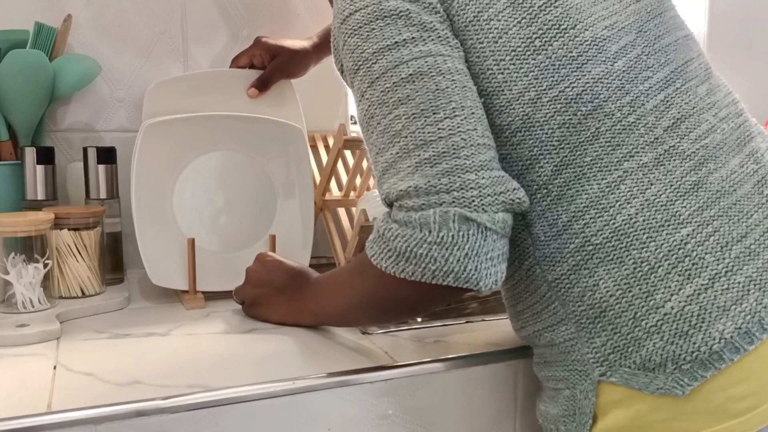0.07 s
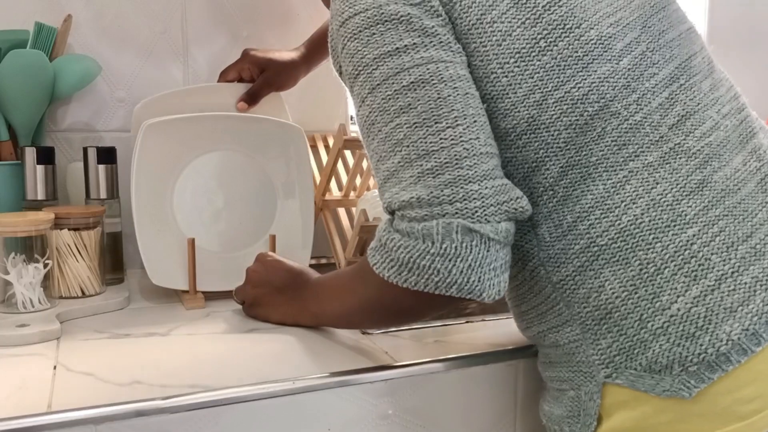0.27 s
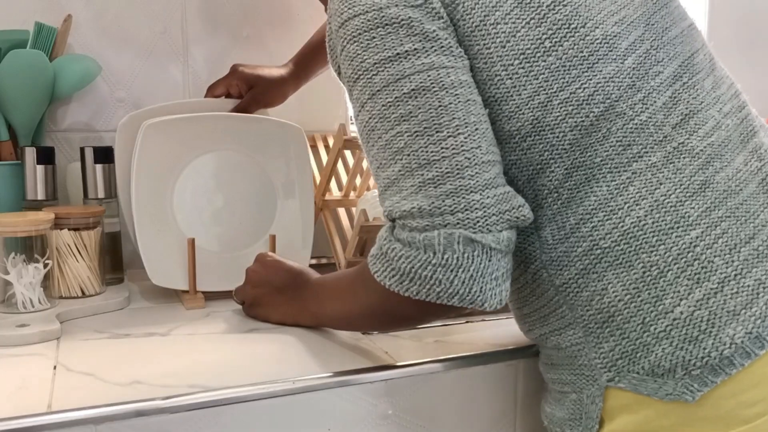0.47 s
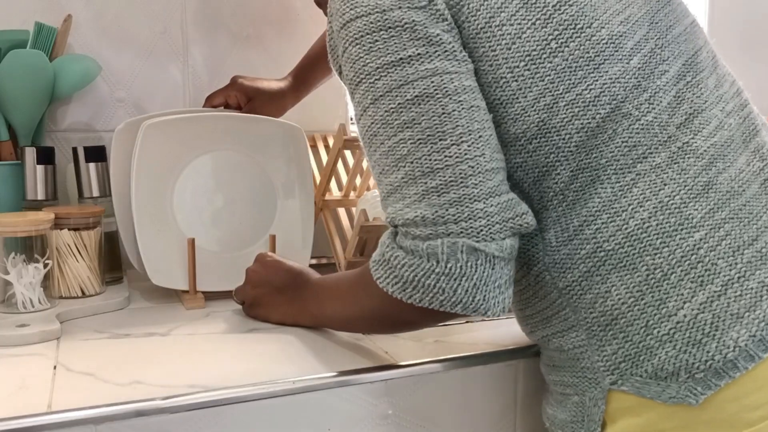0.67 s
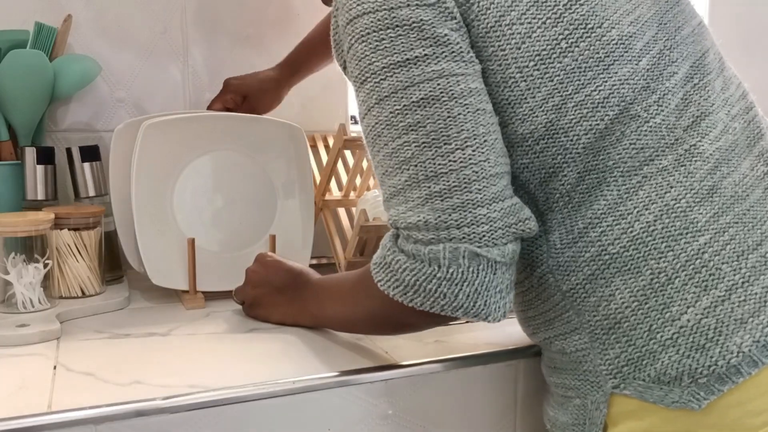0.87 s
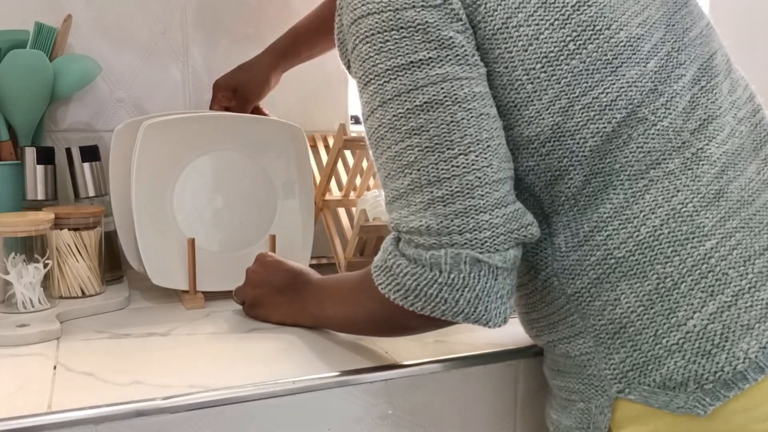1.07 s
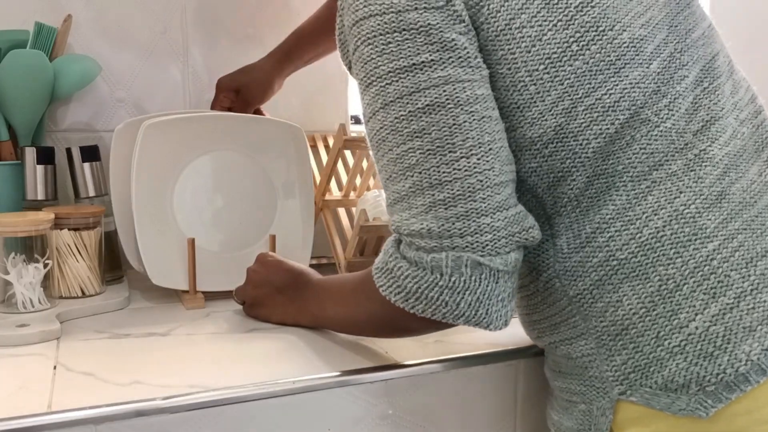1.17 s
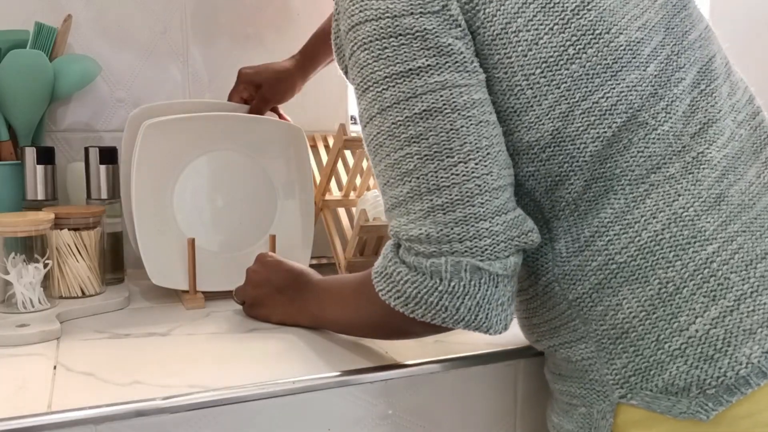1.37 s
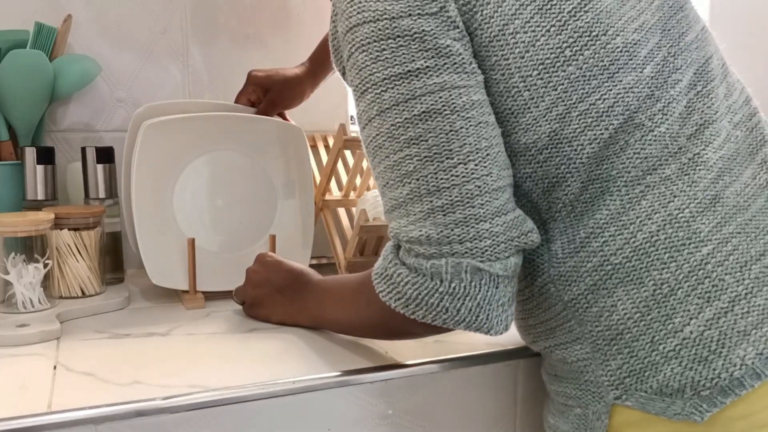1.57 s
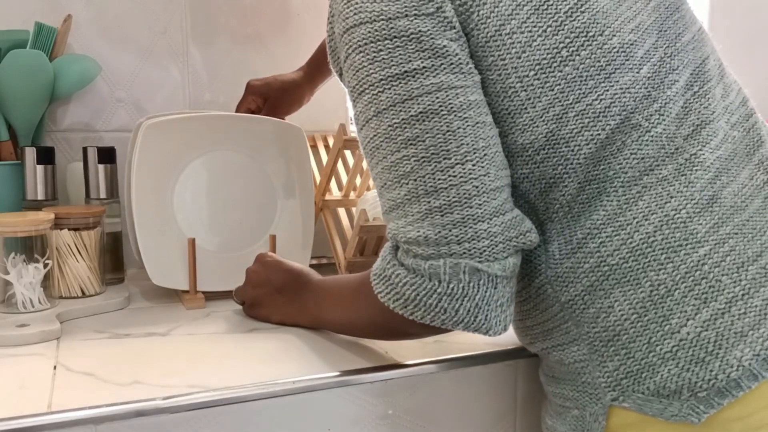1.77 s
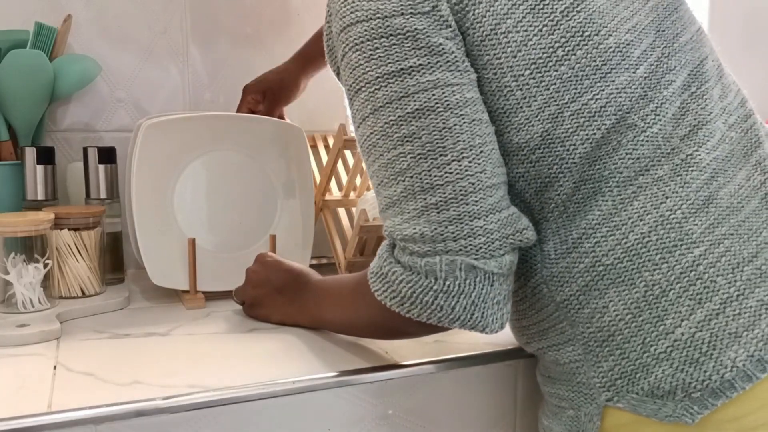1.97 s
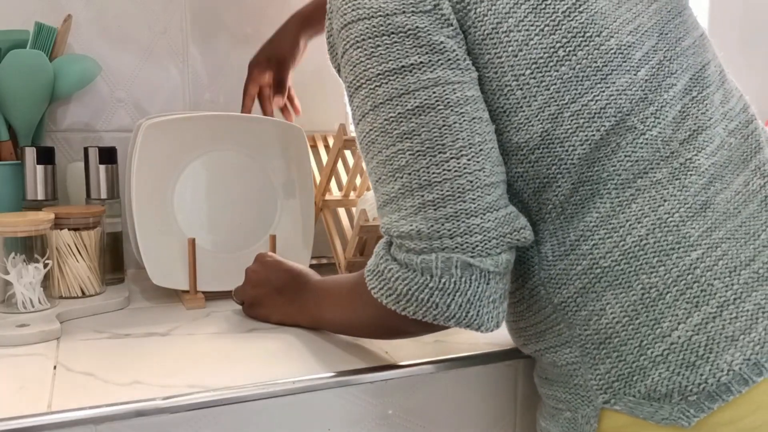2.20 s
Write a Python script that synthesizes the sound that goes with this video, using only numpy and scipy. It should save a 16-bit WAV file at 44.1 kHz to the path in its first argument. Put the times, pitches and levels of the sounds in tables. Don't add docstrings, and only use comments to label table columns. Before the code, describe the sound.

Ceramic plates clink sharply together as one is set into a wooden stand on a kitchen counter

```python
import sys
import numpy as np
from scipy import signal
from scipy.fft import rfft, irfft, next_fast_len
from scipy.io import wavfile
from scipy.ndimage import uniform_filter1d

SR = 44100
rng = np.random.default_rng(int(sys.argv[2]) if len(sys.argv) > 2 else 0)


def volts_from_decibels(level):
    exponent = np.asarray(level, float) / 20
    return 10 ** exponent


def transcribe(u):
    v = np.clip(np.atleast_2d(u).T, -1, 1)
    q = np.round(v * 32767).astype(np.int16)
    wavfile.write(sys.argv[1], SR, q)


N = 98607
T = np.arange(N) / SR
SIZE = next_fast_len(N + SR)
F = np.arange(SIZE // 2 + 1) * SR / SIZE


def curve(table, at):
    return np.interp(at, *np.array(table, float).T)


def log_curve(table, hz):
    row_hz, value = np.array(table, float).T
    return np.interp(np.log(hz), np.log(row_hz), value)


def unit(x):
    return x / np.sqrt(np.mean(x ** 2))


def convolve(x, h):
    return irfft(rfft(x, SIZE) * rfft(h, SIZE), SIZE)[..., :N]


def walk(rate_hz):
    k = int(SR / rate_hz)
    smooth = uniform_filter1d(rng.standard_normal(N), k)
    return unit(uniform_filter1d(smooth, k))


def resonate(x, bands):
    out = np.zeros(len(x))
    for hz, width_hz, db in bands:
        b, a = signal.iirpeak(hz, hz / width_hz, fs=SR)
        out += volts_from_decibels(db) * signal.lfilter(b, a, x)
    return out


def rub(levels, bands, grain_db, flicker_db):
    grit = rng.standard_normal(N) * volts_from_decibels(grain_db * rng.exponential(size=N))
    return unit(resonate(grit, bands)) * volts_from_decibels(curve(levels, T) + flicker_db * walk(23))


def stereo_noise(db):
    # (f/Hz, likeness/-1..1)
    likeness = [(150, 0.89), (300, 0.88), (600, 0.54), (1200, -0.31), (2500, 0.016), (5000, -0.057)]
    like = np.clip(log_curve(likeness, F + 1), -1, 1)
    noise = rfft(rng.standard_normal((2, SIZE))) * volts_from_decibels(db)
    mid, side = noise * np.sqrt([1 + like, 1 - like])
    return irfft(np.array([mid + side, mid - side]), SIZE)[:, :N] / 2


def room_tone():
    # (f/Hz, level/dB)
    air_colour = [(12, -44), (20, -12.5), (53, -7), (154, -7.5), (198, -4), (228, -16), (328, -8.5),
                  (949, -24.5), (16000, -39)]
    # (t/s, level/dB)
    swell = [(0, 2.5), (.5, 7.5), (1.1, 12.5), (1.7, 13.5), (2.24, 9.5)]
    air = unit(stereo_noise(log_curve(air_colour, F + 1)))
    low = signal.sosfilt(signal.butter(2, 170, fs=SR, output="sos"), air)
    rumble = low * volts_from_decibels(curve(swell, T) + 0.4 * walk(6.0))
    return volts_from_decibels(-70) * (air - low + rumble)


def slide():
    # (t/s, level/dB)
    slide_levels = [(0, -78), (.12, -101), (.18, -86), (.26, -73.5), (.36, -67.5), (.45, -76.5),
                    (.52, -59.5), (2.24, -76)]
    # (f/Hz, width/Hz, level/dB)
    slide_bands = [(450, 220, 4), (1030, 24, -1), (1290, 1350, -9.5), (1950, 180, -6.5), (3120, 1800, -31)]
    return rub(slide_levels, slide_bands, grain_db=4.7, flicker_db=0.54)


def lone_rings():
    # (t/s, f/Hz, width/Hz, level/dB)
    ring_events = [(0.5335, 2950, 64, -32), (0.861, 3400, 40, -51), (0.514, 2700, 17, -45),
                   (.603, 3032, 18, -28.5), (.615, 2503, 12, -34), (.9015, 1965, 19, -35.5),
                   (1.6985, 5400, 69, -45), (1.5415, 3050, 17, -47.5), (1.8015, 2440, 27, -29),
                   (.2215, 1016, 6.5, -64.5), (0.534, 281.5, 15, -39), (.862, 1970, 13, -47),
                   (0.99, 420, 60, -40), (.6652, 2100, 150, -43), (.68, 514, 120, -49.5),
                   (.9501, 974, 45, -44.5), (1.013, 11400, 1000, -67), (1.6, 403, 49, -55),
                   (1.1187, 11800, 2500, -60), (0.93, 4600, 1200, -55.5), (1.1614, 4700, 1400, -51.5),
                   (1.47, 270, 24, -50.5), (1.449, 474, 146, -48), (1.451, 1310, 260, -50.5),
                   (1.5232, 5260, 130, -53.5), (1.6964, 444, 15.6, -36), (1.6987, 978, 29, -34),
                   (1.6984, 880, 13, -45.5), (1.7905, 2600, 10, -36), (1.79, 2020, 53, -29.5),
                   (1.8305, 3105, 6, -30), (1.7771, 428, 94, -38), (1.811, 308, 64, -40.5),
                   (2.1, 440, 9.9, -53.5), (1.9374, 4750, 300, -41.5), (2.063, 530, 230, -60)]
    rise_s = 0.001
    out, t = np.zeros(N + SR), T[:SR // 4]
    for start_s, hz, width_hz, db in ring_events:
        i = int(start_s * SR)
        envelope = (1 - np.exp(-t / rise_s)) * np.exp(-np.pi * width_hz * t)
        out[i:i + len(t)] += volts_from_decibels(db) * width_hz * envelope * np.sin(2 * np.pi * hz * t)
    return out[:N] * 2 * np.pi / SR * volts_from_decibels(53.0)


def clinks():
    # (f/Hz, rms level/dB)
    first_clink = [(2503, -60), (2697, -47), (3031, -35), (3720, -36), (4414, -58), (4581, -57),
                   (5276, -48), (5351, -49), (6315, -60), (6939, -55), (7391, -59), (7698, -57),
                   (8183, -59), (8522, -56)]
    second_clink = [(952.8, -42.5), (1970, -50), (3499, -45), (3844, -44), (4517, -46), (5324, -61),
                    (5469, -58), (5862, -69), (6988, -57), (7445, -62)]
    third_clink = [(942.1, -54), (1986, -59), (2525, -45), (2794, -63), (3052, -59), (3973, -61),
                   (4619, -60), (4861, -59), (5324, -58), (5443, -55), (8333, -59)]
    fourth_clink = [(764.4, -58), (904.4, -54), (1927, -56), (2196, -60), (2396, -67), (2525, -50.5),
                    (3036, -48), (3090, -56), (3774, -63), (3914, -67), (4436, -53), (4829, -63),
                    (5362, -48)]
    fourth_rim = [(6401, -66), (7375, -52), (7827, -75), (8134, -76), (8425, -69), (9345, -77), (9943, -66),
                  (11235, -80), (11563, -64), (12871, -75), (13846, -80)]
    fifth_clink = [(414.5, -49), (963.6, -52), (1427, -55), (1976, -40), (2697, -45.5), (3095, -42.5),
                   (3919, -61.5), (4829, -68), (5313, -64), (6670, -67)]
    last_clink = [(1976, -53), (2046, -54), (2369, -44), (2449, -42), (2805, -56), (3112, -41), (3741, -50),
                  (4231, -53), (4834, -51), (5394, -62), (5814, -56.5), (6110, -55), (6907, -58),
                  (7364, -60)]
    # (t/s, boost level/dB, t60 at 3 kHz/s)
    clink_events = [
        (0.514, 5.5, 0.5),
        (.860, 3.5, 0.36),
        (.950, 0.5, 0.32),
        (1.319, 7, 0.58),
        (1.32, 4.5, 0.59),
        (1.698, 2.5, 0.47),
        (1.783, 4, .55),
    ]
    partials = (first_clink, second_clink, third_clink, fourth_clink, fourth_rim, fifth_clink, last_clink)
    swell_s, t60_slope = 0.004, -0.19
    beat_hz, beat_depth, spread_rad = 11, 0.53, 0.97
    out, t = np.zeros((2, N + SR)), T[:SR // 2]
    for (start_s, boost_db, t60_s), lines in zip(clink_events, partials):
        i = int(start_s * SR)
        hz, db = np.array(lines, float).T[:, :, None]
        turn, lag, beat = rng.uniform(-1.4, 1, (3, len(hz), 1))
        decay = 1000. ** (-t / (t60_s * (hz / 3000) ** t60_slope))
        beating = 1 + beat_depth * np.sin(2 * np.pi * beat_hz * (1 + beat / 2) * t + np.pi * turn)
        shape = volts_from_decibels(db + boost_db) * (1 - np.exp(-t / swell_s)) * decay * beating
        for k, side in enumerate((1, -1)):
            tones = np.sin(2 * np.pi * hz * t + side * spread_rad * lag)
            out[k, i:i + len(t)] += np.sum(shape * tones, axis=0)
    return out[:, :N]


def knocks():
    # (f/Hz, width/Hz, level/dB)
    front_plate = [(2560, 60, -17), (2695, 15, -13), (3032, 33, -9), (3087, 31, -20.5), (3728, 48, -12.5),
                   (4600, 27, -19.5), (5343, 69, -16.5), (6450, 80, -29.5), (6870, 26, -18),
                   (7370, 48, -18.5), (8090, 117, -20.5), (10040, 27, -56), (9900, 30, -42),
                   (11500, 190, -28.5)]
    back_plate = [(1797, 27, -22), (2093, 27, -13), (2093, 28, -17), (2344, 18, -8), (2460, 25, -8),
                  (2703, 77, -14.5), (3070, 76, -11.5), (3670, 270, -24), (4260, 77, -24), (5040, 39, -23),
                  (5330, 88, -38), (5990, 46, -19.5), (7410, 46, -18.5), (8700, 50, -76)]
    held_plate = [(1936, 48, -15), (2511, 21, -4), (3070, 76, -11.5), (3928, 60, -6.5), (4536, 48, -7.5),
                  (4840, 82, -12), (5380, 68, -8), (6457, 84, -12), (7400, 40, -21), (8370, 24, -13.5),
                  (9300, 20, -48), (9450, 20, -84), (11560, 54, -81), (13500, 34, -71)]
    stand = [(431, 14.7, -8.5), (594, 103, -19.5), (774, 120, -32), (960, 55, -6.5), (1230, 44, -25),
             (1455, 15, -38), (1968, 31, -12)]
    # (f/Hz, width/Hz, level/dB)
    rim_modes = [(8450, 16, -32), (9440, 17, -29), (9630, 38, -32.5), (10140, 20, -27), (11186, 44, -29),
                 (11440, 51, -34.5), (12060, 36, -31.5), (12800, 45, -35), (13260, 45, -33.5),
                 (13900, 56, -36), (14600, 65, -35)]
    # (t/s, front plate level/dB, back plate level/dB, held plate level/dB, stand level/dB)
    contacts = [(0.5147, -16.5, -77, -43, -34), (0.5334, -25, -71, -62, -38.5),
                (0.6646, -37, -36, -42.5, -36.5), (.6855, -39.5, -34, -47, -53),
                (0.7945, -55, -61, -56, -43), (0.8595, -32, -43, -36, -29), (0.9156, -41, -61, -58, -36.5),
                (0.9491, -34.5, -41, -34.5, -78), (1.016, -39, -37.5, -57, -70),
                (1.1161, -73, -79, -45, -73), (1.1614, -82, -67, -44.5, -82),
                (1.3182, -32.5, -38.5, -35, -37.5), (1.450, -72, -75, -53.5, -42),
                (1.474, -79, -74, -77, -57), (1.5217, -71, -50.5, -68, -56),
                (1.6971, -38, -35.5, -46.5, -35), (1.7771, -69, -18, -26, -33.5),
                (1.797, -60, -25, -41, -32.5), (1.8299, -56, -27, -60, -46), (1.9373, -68, -52, -44, -56)]
    # (low edge f/Hz, high edge f/Hz, level against its modes/dB)
    snap_bands = [
        (2600, 9250, 1.5),
        (1650, 6750, 8),
        (2480, 6500, -5),
        (315, 2720, 11.5),
    ]
    scatter_db = 1.0
    out, t, rows = np.zeros(N + SR), T[:SR // 5], np.array(contacts)
    click = 1. * (t == 0)
    objects = (front_plate + rim_modes, back_plate + rim_modes, held_plate + rim_modes, stand)
    for k, modes in enumerate(objects):
        hz, width_hz, mode_db = np.array(modes, float).T[:, :, None]
        decay = np.exp(-np.pi * width_hz * t)
        ring = volts_from_decibels(mode_db) * width_hz * decay * np.sin(2 * np.pi * hz * t) * 2 * np.pi / SR
        low_hz, high_hz, snap_db = snap_bands[k]
        band = signal.butter(5, [low_hz, high_hz], "band", fs=SR, output="sos")
        snap = volts_from_decibels(snap_db - 32.5) * signal.sosfilt(band, click)
        chance = rng.standard_normal((len(rows), len(hz)))
        hits = volts_from_decibels(scatter_db * chance) @ ring + snap
        for start_s, db, hit in zip(rows[:, 0], rows[:, k + 1], hits):
            i = int(start_s * SR)
            out[i:i + len(t)] += volts_from_decibels(db) * hit
    return out[:N] * volts_from_decibels(51.5)


def grind():
    # (t/s, level/dB)
    grind_levels = [(1.005, -94), (1.015, -51), (1.06, -57), (1.105, -66), (1.119, -52), (1.15, -57),
                    (1.175, -52), (1.22, -67), (1.27, -89)]
    # (f/Hz, width/Hz, level/dB)
    squeal_bands = [(11300, 900, -1), (12000, 600, -5), (7200, 1900, -4), (4700, 1200, -4)]
    return rub(grind_levels, squeal_bands, grain_db=1.5, flicker_db=1.2)


def kitchen(direct_db):
    # (f/Hz, t60/s)
    t60_table = [(200, 0.62), (1000, 0.51), (3000, 0.62), (6000, 0.45), (11000, 0.25), (15000, 0.26)]
    build_s = 0.00057
    t = T[:SR]
    noise, tail = rfft(stereo_noise(0)[:, :SR]), 0
    octave = np.log2(np.arange(SR // 2 + 1) + 1)
    for hz in 100 * 2. ** np.arange(8):
        share = np.clip(1 - abs(octave - np.log2(hz)), 0, 1)
        tail = tail + irfft(noise * share, SR) * 1000. ** (-t / log_curve(t60_table, hz))
    tail = tail * (1 - np.exp(-t / build_s))
    return tail / np.sqrt(np.sum(tail ** 2) / 2) + volts_from_decibels(direct_db) * (t == 0)


def scene():
    plates = slide() + knocks()
    pegs = lone_rings() + grind()
    wet = convolve(plates, kitchen(direct_db=-18)) + convolve(pegs, kitchen(direct_db=-8)) + clinks()
    thin = signal.sosfilt(signal.butter(6, 254, "high", fs=SR, output="sos"), wet)
    left_db = -1.5
    balance = volts_from_decibels(np.array([[left_db], [-left_db]]) / 2)
    return thin * balance + room_tone()


def band_limit(x):
    return signal.sosfilt(signal.butter(12, 16000, fs=SR, output="sos"), x)


def record(dry):
    dull = signal.sosfilt(signal.butter(12, 14700, fs=SR, output="sos"), dry)
    return band_limit(dull)


dry = scene()
out = record(dry)
transcribe(out)
```